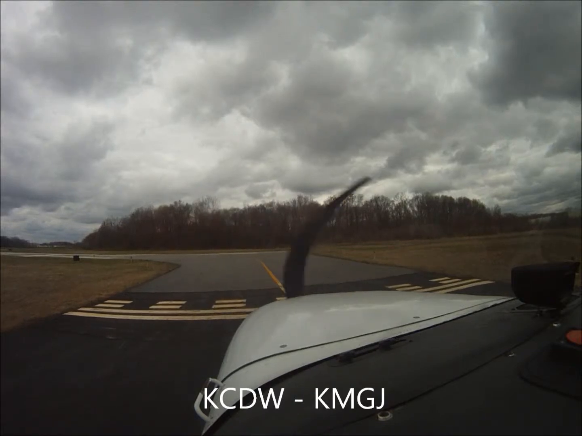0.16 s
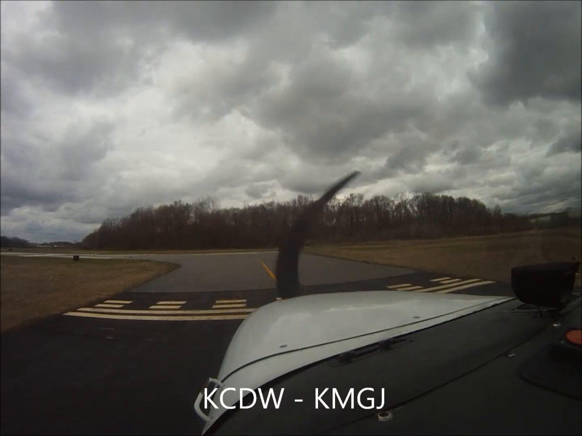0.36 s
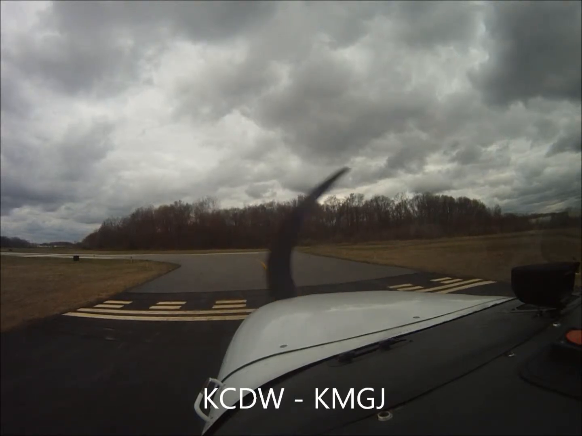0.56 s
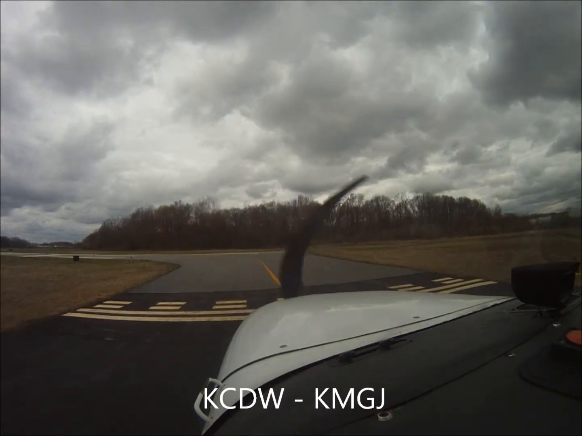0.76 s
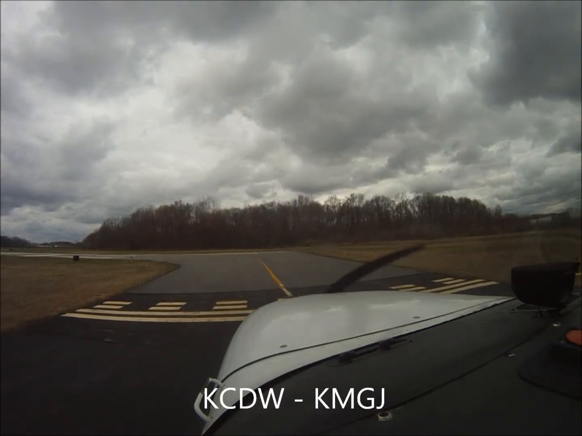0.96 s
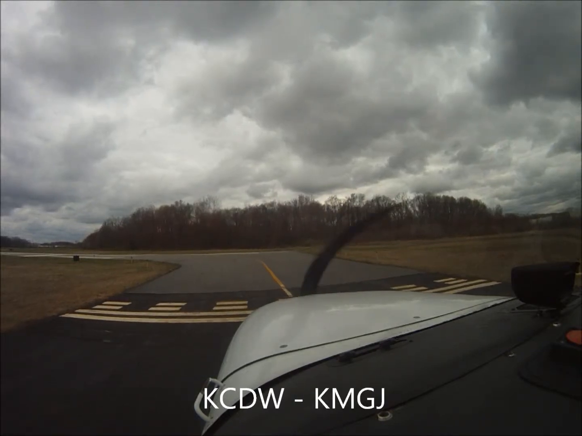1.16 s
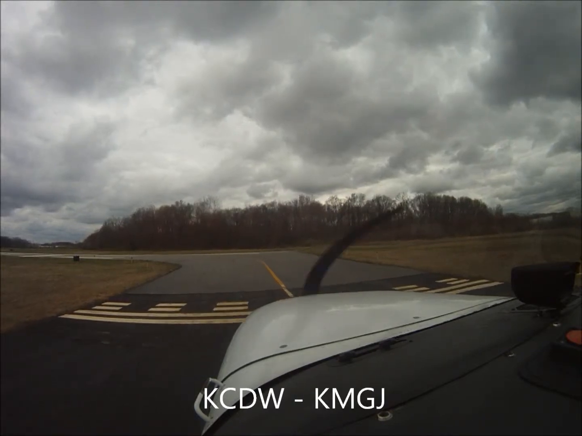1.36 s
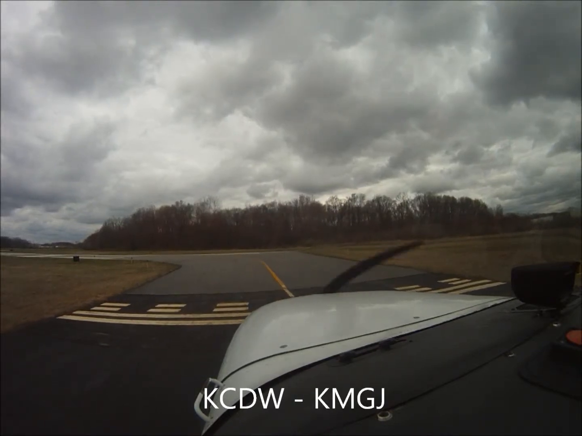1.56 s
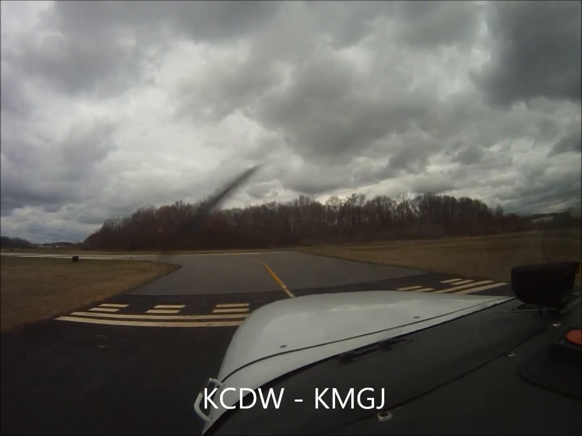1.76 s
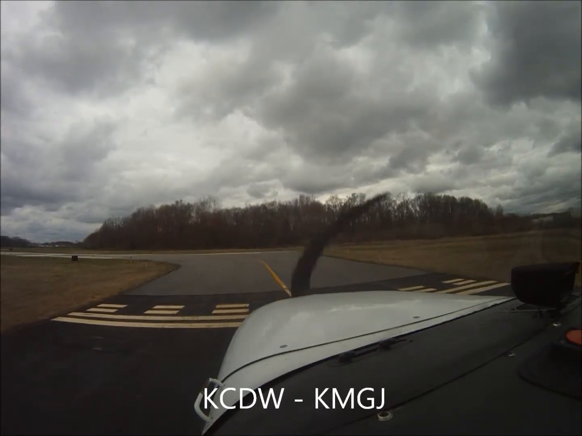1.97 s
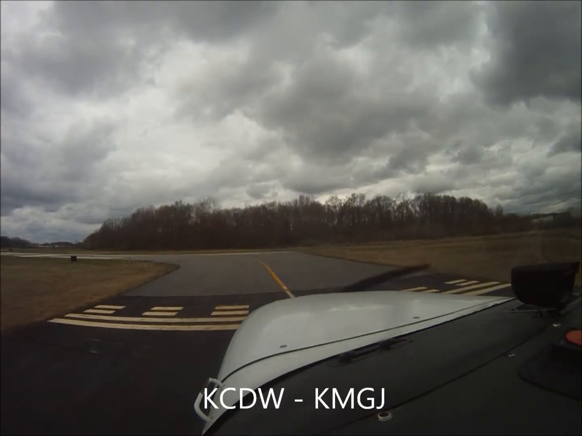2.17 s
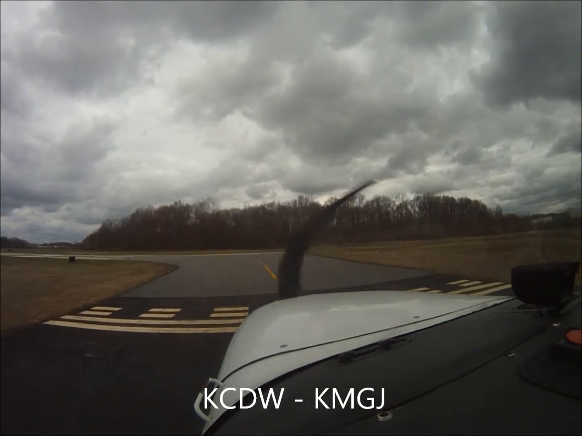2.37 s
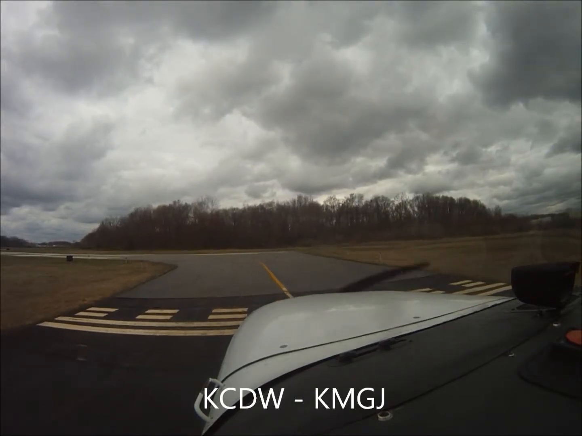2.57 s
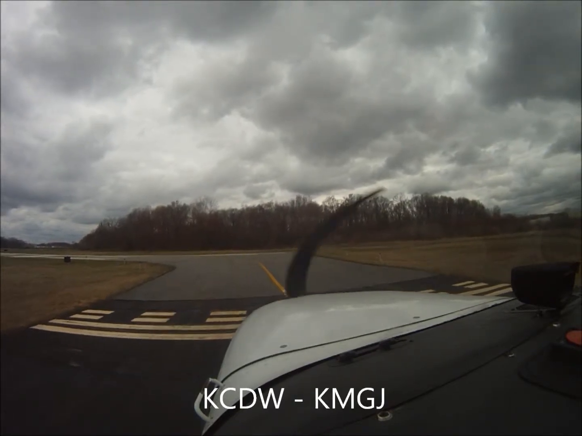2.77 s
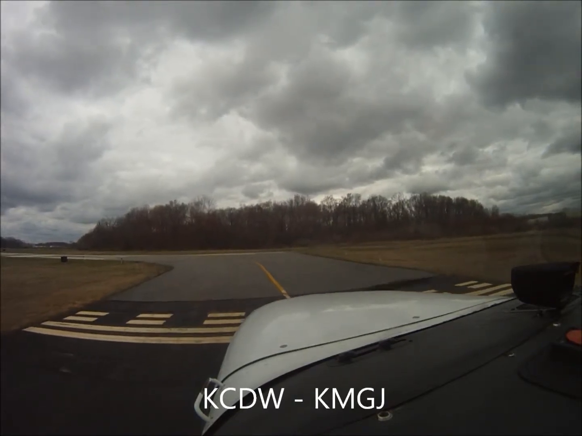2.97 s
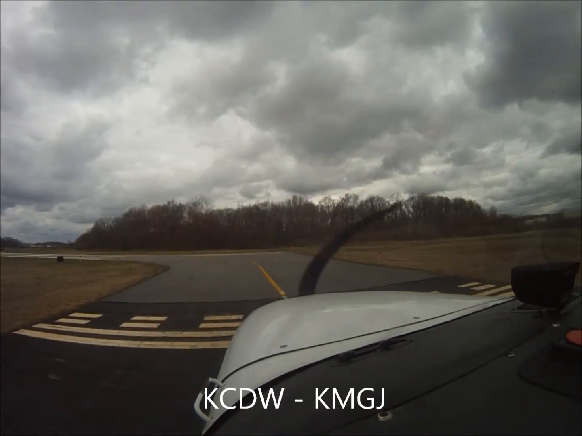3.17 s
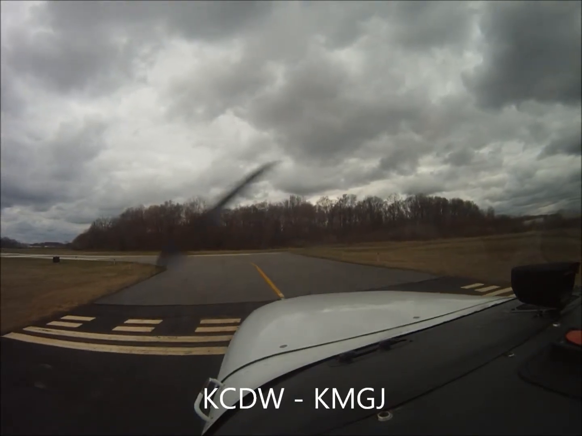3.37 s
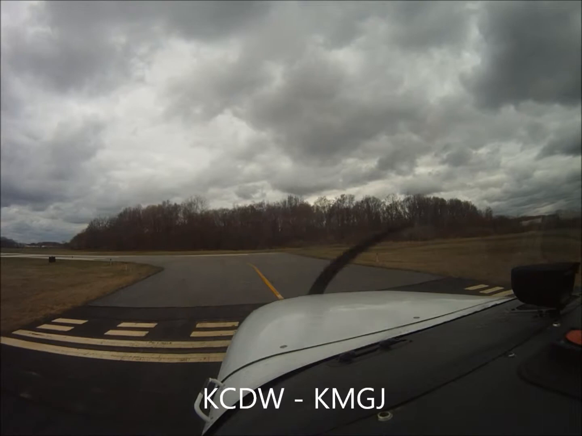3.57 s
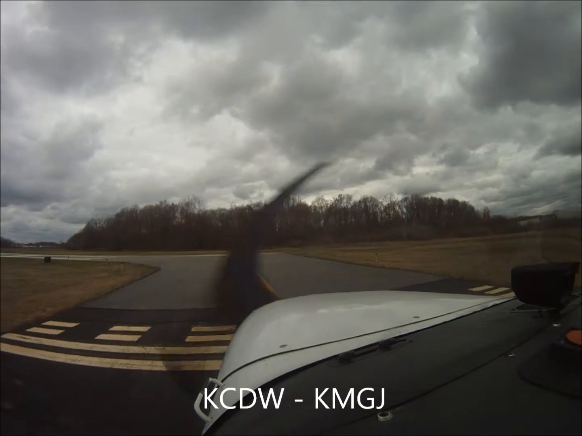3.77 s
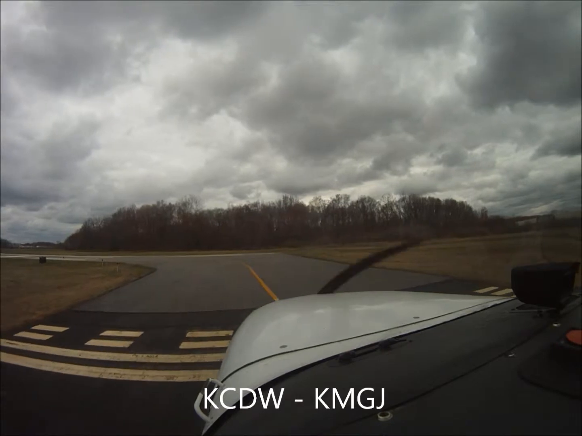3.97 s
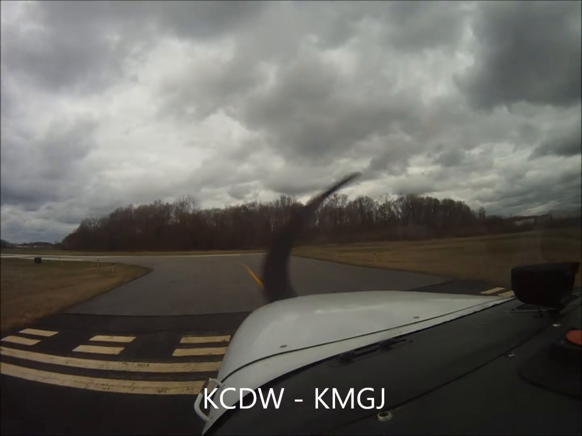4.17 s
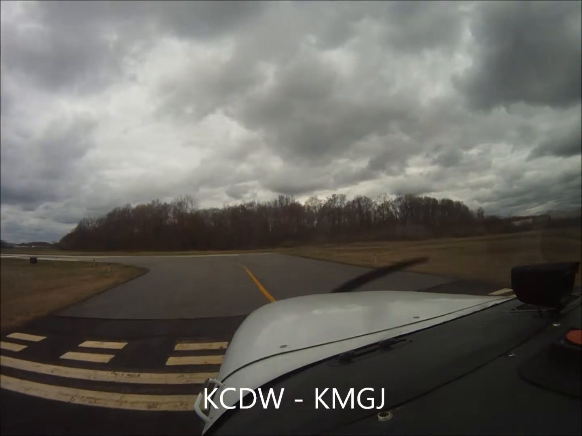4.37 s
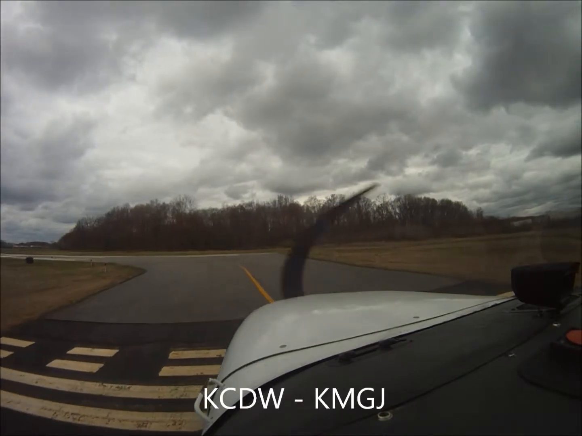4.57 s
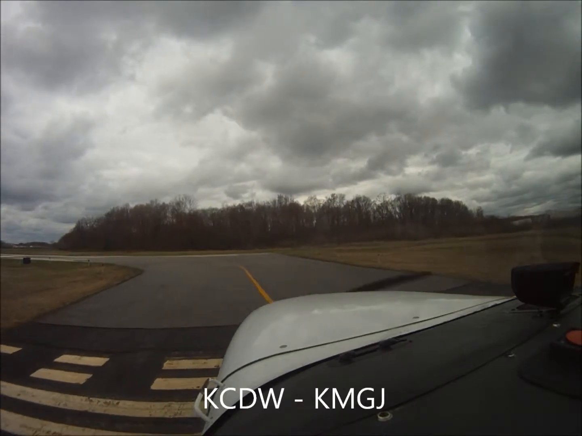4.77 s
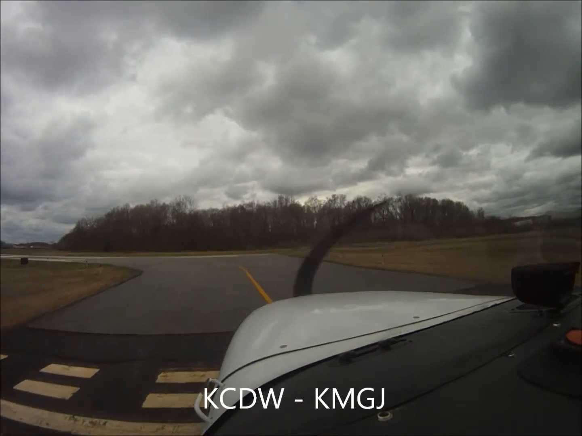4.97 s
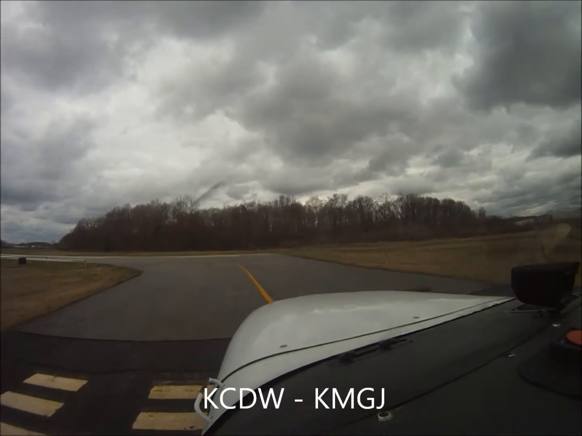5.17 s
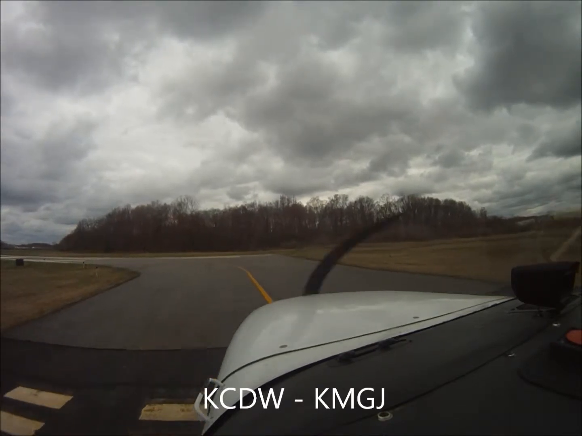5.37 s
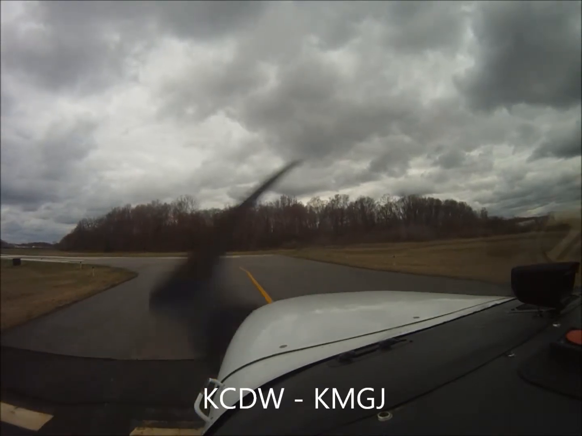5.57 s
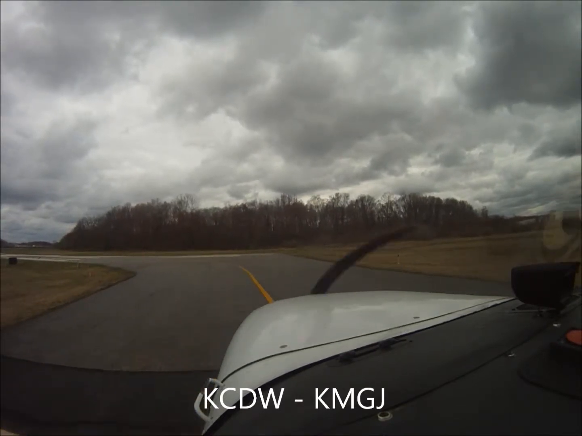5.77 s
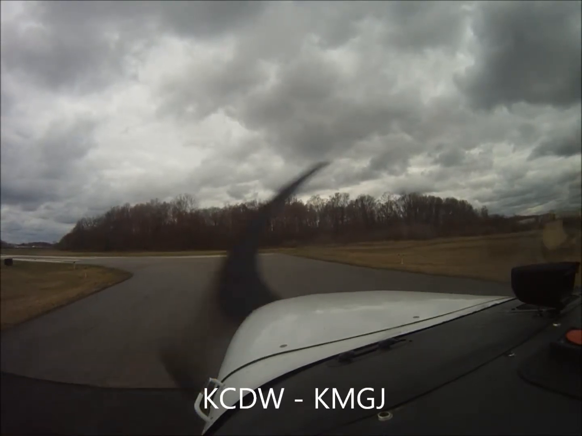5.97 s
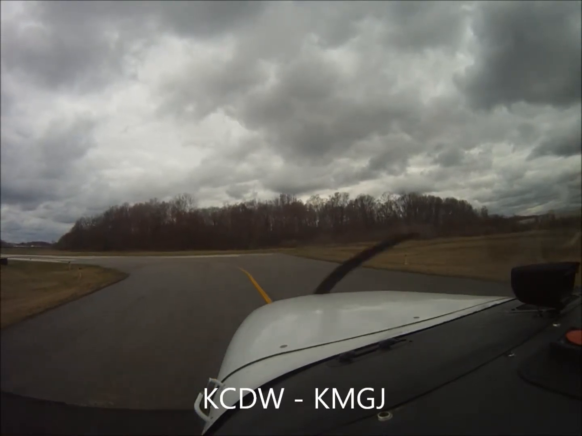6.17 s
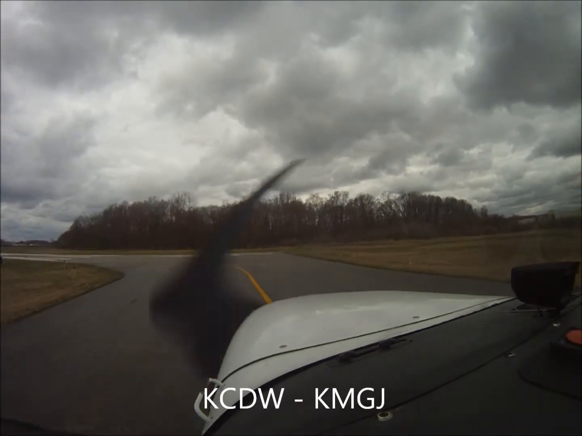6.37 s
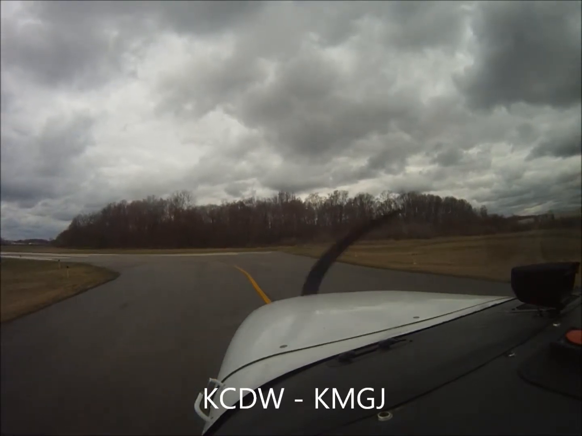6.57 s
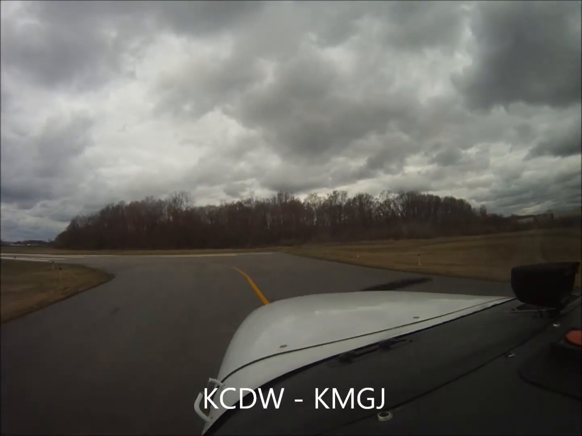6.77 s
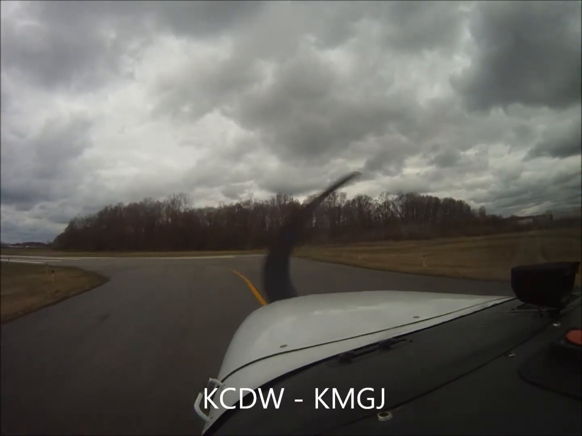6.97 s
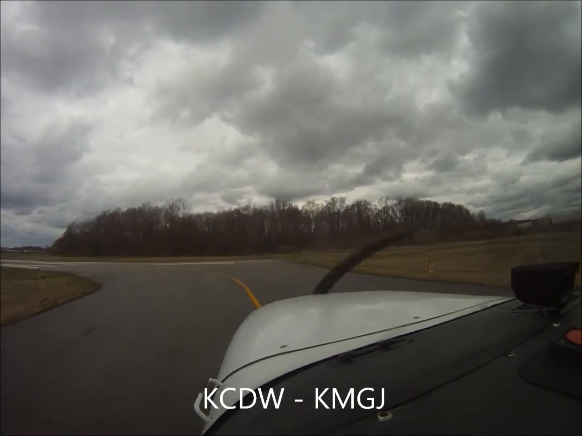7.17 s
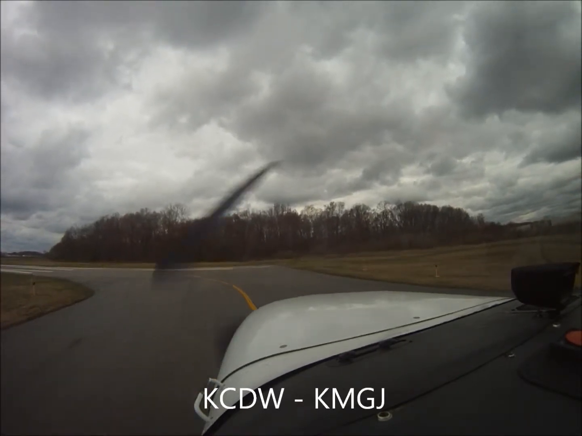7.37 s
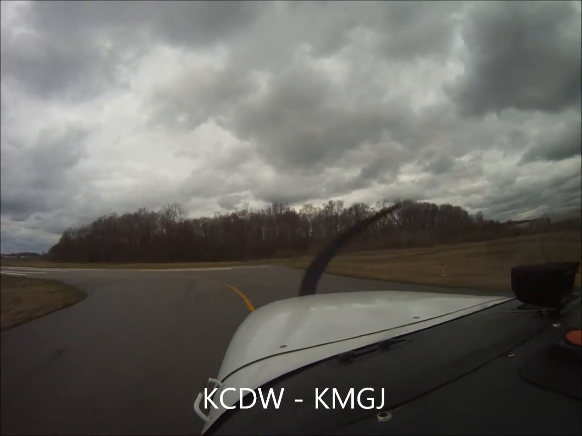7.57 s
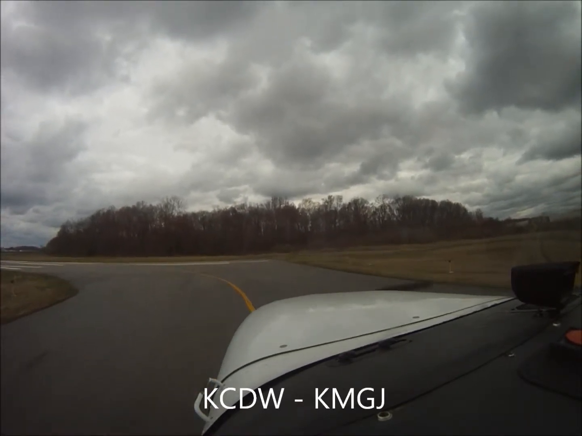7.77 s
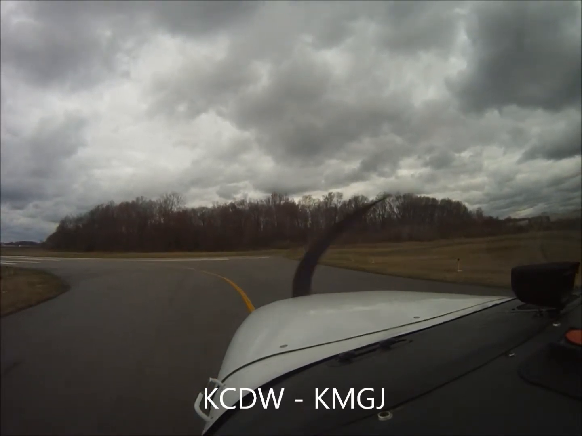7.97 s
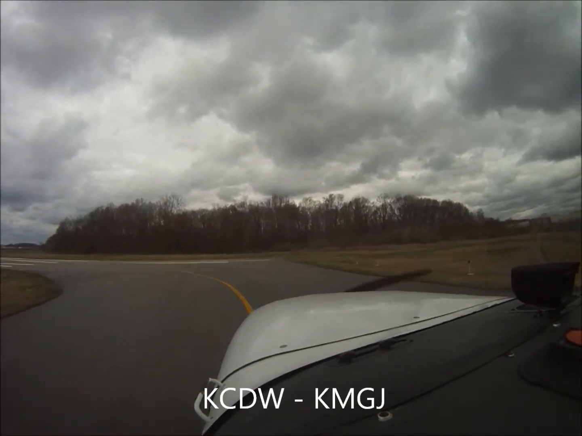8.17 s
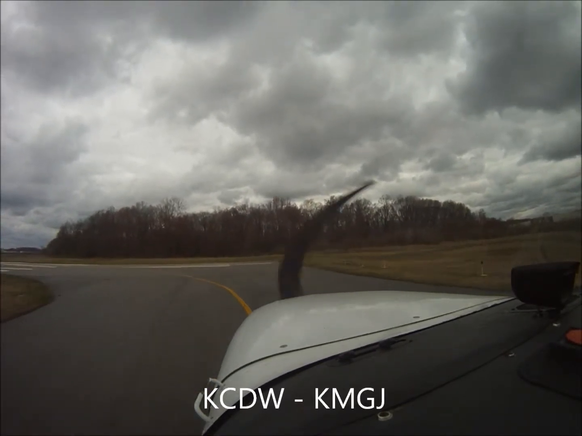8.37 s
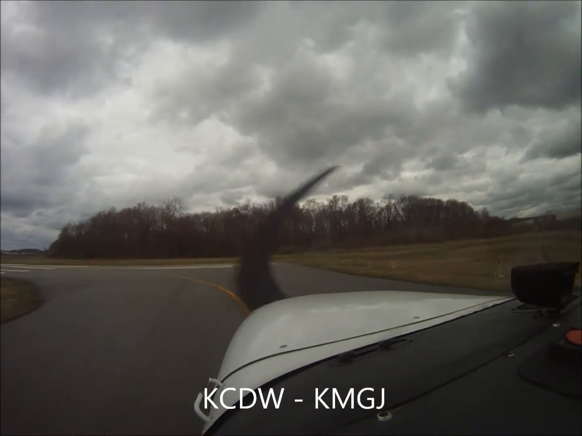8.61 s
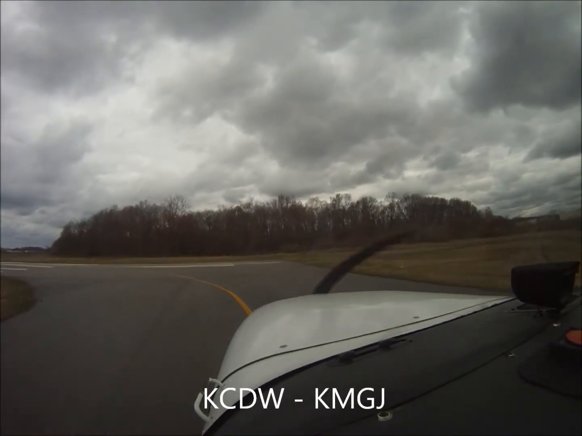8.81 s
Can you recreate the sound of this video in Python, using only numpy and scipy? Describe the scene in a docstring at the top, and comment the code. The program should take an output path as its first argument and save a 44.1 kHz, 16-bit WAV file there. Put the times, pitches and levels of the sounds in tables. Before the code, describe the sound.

Close inside a light aircraft cabin, a four-cylinder piston engine runs throughout. From 0 to 0.9 s it idles quietly and lumpily, about 35 low firings a second, with uneven knocks shaking panels. From 0.9 to 1.5 s it speeds up quickly, a panel knocking hardest around 1.5 s, then rises gently and swells until about 3.3 s, settling into a deep, booming drone near 42 firings a second. Low roar and a fainter higher buzz pulse with it; loose parts rasp and tick sparsely. At 4.0 s a sharp gritty scrape lasts under a tenth of a second, followed by a brief dip in level. Soft low thumps come at 5.8, 6.5 and around 7 s, as the pitch sags slightly and recovers by 7.8 s. Ticks and tiny squeaks crowd the last two seconds. The drone continues to 8.8 s, nearly mono, bass-heavy, with coarse, gritty treble.

```python
"""In the cabin of a taxiing light aircraft, a four-cylinder piston engine speeds up and settles.
The firings boom as tones locked to the engine; exhaust and propeller wash shake the panels as pulsing noise.
Blows ring panels and airframe; loose trim rasps, ticks, squeaks and once scrapes, as short noises and tones.
A mono camera samples the sound at 12 kHz and holds each sample, which mirrors it into the treble."""
import sys
import numpy as np
from scipy import signal
from scipy.fft import rfft, irfft, next_fast_len
from scipy.io import wavfile
from scipy.ndimage import uniform_filter1d

SR = 44100
rng = np.random.default_rng(int(sys.argv[2]) if len(sys.argv) > 2 else 0)


def materialize(psi):
    """Save the field psi as 16-bit PCM at rate SR to the path in sys.argv[1].

    A 1-D psi becomes a single channel; in a 2-D psi each row is a channel.
    """
    bounded = np.clip(np.atleast_2d(psi).T, -1, 1)
    quanta = np.round(bounded * 32767).astype(np.int16)
    wavfile.write(sys.argv[1], SR, quanta)


N = 389844  # length in samples


def undb(db):
    """Turn decibels into a plain gain."""
    return 10 ** (np.asarray(db) / 20)


def unit(x):
    """Scale a sound to an RMS level of 1."""
    return x / np.sqrt(np.mean(x ** 2))


def curves(table):
    """Read the columns of a time table at every sample, with straight lines between rows."""
    seconds, *columns = np.transpose(table)
    return [np.interp(np.arange(N) / SR, seconds, column) for column in columns]


def walk(rate):
    """A slow random wander of RMS 1: random levels, each held 1 / rate seconds, smoothed twice."""
    hold = int(SR / rate)
    steps = np.repeat(rng.standard_normal(N // hold + 1), hold)
    smooth = uniform_filter1d(uniform_filter1d(steps, hold), hold)
    return unit(smooth[:N])


def band(x, hz, width):
    """Keep only the band of this width around hz."""
    edges = [hz - width / 2, hz + width / 2]
    return signal.sosfilt(signal.butter(2, edges, "bandpass", fs=SR, output="sos"), x)


def burst(start_s, peak_ms):
    """Place, time axis and rise-and-fade shape of a short event that peaks after peak_ms."""
    start = int(start_s * SR)
    t = np.arange(min(4000, N - start)) / SR
    x = 1000 * t / max(peak_ms, .3)
    return slice(start, start + len(t)), t, x * np.exp(1 - x)


# How hard each of the four cylinders puffs, in firing order: relative level in dB.
CYLINDER_LEVELS = (-8.5, -13, -2.5, -8)


def puff_sizes(firings, scatter_db):
    """Gain of the current firing: its cylinder's level plus a scatter in dB, one value per firing."""
    count = firings.astype(int)
    return undb(np.array(CYLINDER_LEVELS)[count % 4] + scatter_db[count])


def puffs(firings, scatter_db, decay, steady):
    """An envelope that jumps up at each firing and fades (decay in firings), over a steady floor."""
    size = puff_sizes(firings, scatter_db * rng.standard_normal(N // 500))
    return steady + uniform_filter1d(size * np.exp(-(firings % 1) / decay), size=120)


def shaken(colour, gate, flicker_db, rate):
    """Pulsing coloured noise, split into half-octave bands that each flicker alone."""
    size = next_fast_len(N)
    octave = np.log2(np.arange(1, size // 2 + 2) * SR / size)
    hz, db = np.transpose(colour)
    gain = undb(np.interp(octave, np.log2(hz), db, -90, -90))
    spectrum = rfft(gate * rng.standard_normal(N), size) * gain
    out = 0
    for centre in np.arange(np.log2(hz[0]), np.log2(hz[-1]) + .5, .5):
        share = np.clip(1 - 2 * np.abs(octave - centre), 0, 1)
        out = out + irfft(spectrum * share, size)[:N] * undb(flicker_db * walk(rate))
    return unit(out)


# Tone colour of the low panel roar. Each row: frequency in Hz, relative level in dB per Hz.
ROAR_COLOUR = [(15, -19), (30, -8), (60, -0.5), (110, 3.5), (200, 0), (290, -9), (420, -4), (520, -13.5),
               (680, -12.5), (830, -18), (970, -26.5), (1080, -20.5), (1400, -37.5), (1800, -35.5)]


def roar(firings, roar_db):
    """Exhaust and propeller wash shake the panels: low noise that pulses with the firings."""
    gate = puffs(firings, 3.0, 0.22, steady=0.98)
    return undb(roar_db + 0.64 * walk(2.384)) * shaken(ROAR_COLOUR, gate, flicker_db=1.0, rate=8.8)


# Tone colour of the higher buzz. Each row: frequency in Hz, relative level in dB per Hz.
BUZZ_COLOUR = [(900, -7.5), (1300, -4), (1800, -8.5), (2170, 2.5), (2500, -6), (2900, -1), (3300, -5.5),
               (3800, -11.5), (4700, -11), (5200, -11.5), (5500, -21), (6300, -20)]


def buzz(firings, buzz_db):
    """A higher noise that pulses with the firings and fades more slowly after each than the roar."""
    gate = puffs(firings, 6.2, 0.46, steady=1.0)
    return undb(buzz_db + 0.48 * walk(18)) * shaken(BUZZ_COLOUR, gate, flicker_db=1.6, rate=12)


def rasp(firings):
    """A loose part chatters with the firings, mostly at one cylinder's, now and then much harder."""
    scatter_db = 2.8 * np.minimum(rng.exponential(size=N // 500), 4)
    envelope = puff_sizes(firings, scatter_db) * np.exp(-(firings % 1) / 0.15)
    chatter = uniform_filter1d(envelope, size=60) * rng.standard_normal(N)
    return unit(band(chatter, 1040, 460))


# Thumps through the airframe. Each row: start in seconds, level in dB.
THUMP_TIMES = [(5.799, -15), (6.523, -9.5), (6.716, -16.5), (6.999, -20), (7.045, -11), (7.14, -9),
               (7.475, -16), (7.668, -21), (8.303, -19)]
# Low airframe rings. Each row: frequency in Hz, starting level in dB against the thump,
# time to fade by 60 dB in seconds.
AIRFRAME_RINGS = [(193, -5, 0.1), (276, -1.5, 0.042), (435, -10.5, 0.07)]


def thumps():
    """A soft push sets off the low airframe modes, which ring and die away."""
    out = np.zeros(N)
    starts = rng.random((len(THUMP_TIMES), len(AIRFRAME_RINGS)))
    for (s, db), turns in zip(THUMP_TIMES, starts):
        part, t, _ = burst(s, 1)
        soft_start = 1 - np.exp(-t / 0.0011)
        for (hz, ring_db, t60), turn in zip(AIRFRAME_RINGS, turns):
            fade = undb(db + ring_db - 60 * t / t60)
            out[part] += fade * soft_start * np.sin(2 * np.pi * (hz * t + turn))
    return out


# Dry ticks of loose trim. Each row: start in seconds, level of the high ring in dB,
# extra dB for each ring further down, time to the peak in ms.
TRIM_TICKS = [(0.143, -50, -1, 1.2), (0.2313, -49, 2, 1.2), (0.7452, -51, 3, 1), (0.8016, -41, -5, 1.1),
              (0.956, -47, 3, 1.3), (1.0104, -45.5, 3, 1.1), (1.0675, -47.5, 3.5, 1.3),
              (1.1486, -51, 2, 1.2), (2.4788, -45, 2.5, 1.5), (3.6694, -47, 4.5, 1.3),
              (3.7736, -37.5, 0.5, 1.6), (3.899, -45, 3, 1.9), (4.2175, -46, 4, 1), (4.2383, -46.5, 5, 1.1),
              (4.2915, -48.5, 6, 1.5), (4.4054, -48.5, 4, 1.3), (4.896, -43, 4, 1.1),
              (5.0732, -59.5, 12, 2.3), (5.469, -51, 8, 1.2), (6.089, -42, 1.5, 0.95),
              (6.7176, -43, -4, 1.4), (6.81, -58, 10.5, 1.9), (6.8523, -56.5, 11.5, 1.6),
              (7.0305, -38, -2, 1.7), (7.1454, -43, 1.5, 2.7), (7.3148, -40.5, 2, 1.3),
              (7.4904, -46, -5, 1.3), (7.505, -41, -1, 1.5), (7.7557, -44, 2, 1.5), (7.8017, -39.5, 0.5, 3),
              (7.8098, -44.5, 3.5, 2.9), (7.928, -33.5, -6, 2.7), (7.945, -46, 1, 2), (8.0244, -40, 0, 1.1),
              (8.1178, -40, 2.5, 1.5), (8.2137, -37.5, -1, 1), (8.3138, -45, 1, 1.4),
              (8.384, -49, 6.5, 1.4), (8.4632, -46, 4, 1.2), (8.4871, -47, 1, 1.3), (8.5584, -43, 1, 1.2),
              (8.5999, -54, -2, 1.1), (8.7286, -42, 4, 3), (8.742, -41, 3, 6.3), (8.822, -42.5, 4, 1.1)]
# The high, middle and low ring of the trim. Each row: frequency in Hz, width in Hz.
TRIM_RINGS = [(4500, 1380), (2550, 1200), (1200, 730)]
# Faint ticks: lowest level in dB, upward scatter in dB, share of firings, time to the peak in ms.
FAINT_DB, FAINT_SCATTER_DB, FAINT_SHARE, FAINT_MS = -55.5, 3.5, .3, 0.83


def ticks(firings):
    """Loose trim ticks: short noise bursts through three rings; faint ones fall on chance firings."""
    out = np.zeros(N)
    high, mid, low = (unit(band(rng.standard_normal(N), hz, width)) for hz, width in TRIM_RINGS)
    firing_s = np.flatnonzero(np.diff(firings.astype(int)))[:-1] / SR
    pick, size, tilt = rng.random((len(firing_s), 3)).T
    faint_db = FAINT_DB - FAINT_SCATTER_DB * np.log(size)
    faint = np.c_[firing_s, faint_db, 6 * tilt - 1.5, np.full(len(firing_s), FAINT_MS)]
    for s, db, tilt_db, ms in [*TRIM_TICKS, *faint[pick < FAINT_SHARE]]:
        part, _, shape = burst(s, ms)
        rings = high[part] + undb(tilt_db) * mid[part] + undb(2 * tilt_db) * low[part]
        out[part] += undb(db) * shape * rings
    return out


# Short squeaks of the trim. Each row: start in seconds, level in dB, first and last frequency in Hz.
TRIM_SQUEAKS = [(6.72, -46, 4830, 4630), (7.041, -44, 4700, 4700), (7.147, -39, 4550, 4020),
                (7.16, -35.5, 3340, 3040), (7.505, -38, 4500, 5000), (7.524, -44.5, 5000, 5050),
                (7.801, -37, 4720, 4670), (7.801, -29, 2100, 2210), (7.928, -30.5, 4680, 4600),
                (8.119, -42.5, 4740, 4500), (8.119, -35, 2200, 2200)]
SQUEAK_MS = 3.3  # time to the peak


def squeaks():
    """The trim squeaks: rough little tones that slide in pitch for three times their rise."""
    out, rough = np.zeros(N), walk(900)
    for s, db, first_hz, last_hz in TRIM_SQUEAKS:
        part, t, shape = burst(s, SQUEAK_MS)
        hz = np.interp(t, [0, 3 * SQUEAK_MS / 1000], [first_hz, last_hz])
        tone = np.sin(2 * np.pi * np.cumsum(hz) / SR)
        out[part] += undb(db) * shape * (1 + 0.98 * rough[part]) * tone
    return out


# Moments of one loud short rasp, in seconds: start, broadens, loudest, broad part weaker,
# nearly gone, end.
SCRAPE_TIMES = (4.003, 4.015, 4.018, 4.036, 4.044, 4.066)
# The ring left behind: frequency in Hz, starting level in dB, time to fade by 60 dB in seconds.
SCRAPE_AFTER_RING = (4980, -44.5, .4)
SCRAPE_DB = -21.5  # before the envelopes


def scrape():
    """A rasp of rough noise that starts narrow, turns broad and leaves a faint ring behind."""
    t = np.arange(N) / SR
    grit = rng.standard_normal(N) * undb(0.95 * walk(400))
    narrow_level = np.interp(t, SCRAPE_TIMES, [0.02, 0.5, 0.73, 0.6, 0.2, 0.02])
    narrow = narrow_level * unit(band(grit, 2870, 750))
    broad_level = np.interp(t, SCRAPE_TIMES[1:], [0.0024, 0.85, 0.26, 0.098, 0.0049])
    broad = broad_level * (unit(band(grit, 3840, 2400)) + 0.64 * unit(band(grit, 1060, 1640)))
    after = np.clip(t - SCRAPE_TIMES[3], 0, None)
    hz, ring_db, t60 = SCRAPE_AFTER_RING
    ring = undb(ring_db - 60 * after / t60 + 1.7 * walk(90)) * np.sin(2 * np.pi * hz * after)
    return undb(SCRAPE_DB) * (broad + .5 * narrow) + ring


# Panel modes. Each row: frequency in Hz, relative level in dB, time to fade by 60 dB in seconds.
PANEL_MODES = [(289.7, 0, 0.13), (333.5, -0.5, 0.12), (515, 3, 0.029), (633, -10, 0.013),
               (815, -10.5, 0.046), (1042, -21.5, 0.039)]


def knocks(firings, scatter_db, loud_db):
    """Two uneven blows a firing, each a little late by chance, ring the panel modes."""
    beats = np.flatnonzero(np.diff((2 * firings).astype(int)))
    count = len(beats)
    late = rng.random(count) * 0.003886 * SR
    places = np.minimum(beats + late.astype(int), N - 1)
    # one of the eight blows in an engine cycle lands harder, by up to loud_db
    harder_db = loud_db[beats] * rng.random(count) * (np.arange(count) % 8 == 7)
    shared_db = scatter_db * rng.standard_normal(count) + harder_db
    out = 0
    for hz, db, t60 in PANEL_MODES:
        blows = np.zeros(N)
        blows[places] = undb(shared_db) * rng.uniform(0.21, 1, count) * rng.choice([-1, 1], count)
        # a turning, shrinking number rings at hz and dies away
        pole = np.exp(2j * np.pi * hz / SR - np.log(1000) / (t60 * SR))
        ring = signal.lfilter([1], [1, -pole], band(blows, hz, hz / 2)).imag
        out = out + undb(db) * unit(ring)
    return unit(out)


# The panel that one cylinder knocks: frequency in Hz, width in Hz.
KNOCKED_PANEL = (811, 82)
# Where the knocks are loudest: firing rate in Hz, spread in Hz, step in dB
# (half a step applies at that rate, one and a half steps far from it).
LOUDEST_SPEED = (40.07, 0.9, -8)
CHUG_ECHO_DB, CHUG_AT_S = -3.5, 1.53  # weaker knock half an engine cycle on; time of one knock


def chug(firings, hz):
    """One cylinder knocks a panel each engine cycle, hardest as the engine climbs through one speed."""
    half_cycle = ((firings - firings[int(CHUG_AT_S * SR)]) / 2) // 1
    at = np.flatnonzero(np.diff(half_cycle)) + 1
    blows = np.zeros(N)
    blows[at] = undb(CHUG_ECHO_DB * (half_cycle[at] % 2) + 2.1 * rng.standard_normal(len(at)))
    best_hz, spread_hz, step_db = LOUDEST_SPEED
    near = np.exp(-((hz - best_hz) / spread_hz) ** 2)
    return undb(step_db * (1.5 - near)) * unit(band(blows, *KNOCKED_PANEL))


# How the cabin passes the three lowest multiples of the firing rate as they climb.
# Each row: frequency in Hz, level in dB at settled power.
CABIN_BOOM = [(34, -22.5), (36, -21.5), (39, -17), (42.5, -20.5), (69, -24.5), (75, -26.5), (80, -23),
              (84, -19.5), (85.5, -20), (104, -21.5), (111, -17.5), (120, -25), (125.5, -25), (128, -24.5)]
# Weaker lines. Each row: multiple of the firing rate, level against the panel roar in dB
# while slow, the same when settled, both before the cabin air lifts the line.
WEAK_LINES = [(.5, -27, -7.5), (.75, -20, -9), (1.25, -14, -7.5), (2.5, -20, -12.5), (4, -5.5, -12),
              (5, -7.5, -15), (6, -12, -14.5), (6.75, -42, -15), (8, -36, -23.5), (10, -14, -25),
              (12, -20, -16), (15, -13.5, -23), (20, -25.5, -33)]
# An air mode that lifts whichever line passes it: frequency in Hz, width in Hz, lift in dB.
CABIN_AIR = (205, 13.2, 8.7)


def boom(firings, hz, power_db, roar_db):
    """Firing beats boom in the cabin: wavering tones at multiples of the firing rate."""
    out, uneven_db = 0, 1.3 * walk(16)
    # the three strong lines add up to a rise and a steep pressure drop at each firing
    for k in range(1, 4):
        db = power_db + np.interp(k * hz, *np.transpose(CABIN_BOOM))
        db = db + 0.12 * walk(22) + (k > 1) * uneven_db
        phase = 2 * np.pi * k * (firings - .32) - .6 + 0.078 * k * walk(11)
        out = out - np.sqrt(2) * undb(db) * np.cos(phase)
    settled = np.clip((hz - hz.min()) / (hz.max() - hz.min()), 0, 1)  # 0 slowest, 1 fastest
    mode_hz, width_hz, lift_db = CABIN_AIR
    for k, slow_db, settled_db in WEAK_LINES:
        lift = lift_db / (1 + (2 * (k * hz - mode_hz) / width_hz) ** 2)
        db = roar_db + slow_db + (settled_db - slow_db) * settled + lift + 2.5 * walk(5)
        phase = 2 * np.pi * (k * firings + rng.random()) + 0.18 * walk(6.6)
        out = out + np.sqrt(2) * undb(db) * np.cos(phase)
    return out


# Brief dips of the whole level. Each row: start in seconds, depth in dB before smoothing,
# recovery time in seconds.
LEVEL_DIPS = [(4.045, -6.5, 0.06), (5.9, -3, 0.015), (6.742, -4, 0.03), (7.005, -3.5, 0.038)]


def dips():
    """A gain that drops briefly at a few moments and eases back."""
    t = np.arange(N) / SR
    dip_db = sum(db * (t > s) * np.exp(-np.clip(t - s, 0, None) / back) for s, db, back in LEVEL_DIPS)
    return undb(uniform_filter1d(dip_db, size=200))


# Engine speed over time. Each row: time in seconds, firing rate in Hz.
ENGINE_SPEED = [(0, 35), (.75, 34.65), (.95, 35.7), (1.5, 40.4), (1.75, 41.3), (2.4, 42.3), (3.1, 42.72),
                (6, 42.68), (6.8, 41.97), (7.4, 41.85), (7.8, 42.22), (8.84, 42.25)]
# Engine level over time. Each row: time in seconds, level of the whole engine against its
# settled level in dB, extra level of the buzz in dB.
ENGINE_POWER = [(0, -8.5, 1.5), (.9, -6, 1.5), (1.4, -6, 0.5), (2.1, -4, -1), (2.6, -2, 0.5), (3.3, 0, 0),
                (4.2, -0.5, 0), (5.8, 0, 0), (7.3, -1, 0), (8, 0.5, 0.5), (8.84, 0, 1.5)]
ROAR_DB, BUZZ_DB, SHAKE_DB = -26, -47.5, -32.5  # levels at settled power
SHAKE_FOLLOWS = 0.54  # dB of panel blows per dB of engine level
LOUD_BLOW_DB, LUMPY_IDLE = 7, 0.61  # hardest extra blow; dB more per dB of lower engine level
CHUG_DB = -8.5  # against the panel roar, before the effect of speed


def scene():
    """Let one engine drive the cabin sounds, add the other trim and airframe noises, then the dips."""
    (hz,), (power_db, extra_db) = curves(ENGINE_SPEED), curves(ENGINE_POWER)
    roar_db, buzz_db = ROAR_DB + power_db, BUZZ_DB + power_db + extra_db
    firings = np.cumsum(hz) / SR  # running count; four firings make one engine cycle
    cabin = roar(firings, roar_db) + buzz(firings, buzz_db)
    cabin = cabin + undb(buzz_db - 4.5) * rasp(firings)
    cabin = cabin + thumps() + ticks(firings) + squeaks() + scrape()
    blows = knocks(firings, 1.56, LOUD_BLOW_DB - LUMPY_IDLE * power_db)
    cabin = cabin + undb(SHAKE_DB + SHAKE_FOLLOWS * power_db) * blows
    cabin = cabin + undb(roar_db + CHUG_DB) * chug(firings, hz)
    cabin = (cabin + boom(firings, hz, power_db, roar_db)) * dips()
    return np.array([cabin, cabin])


# How far the channels differ. Each row: frequency in Hz, left minus right against their sum in dB.
CHANNEL_DIFFERENCE = [(30, -46), (125, -54), (600, -48.5), (1000, -24), (2000, -20.5), (4000, -22),
                      (8000, -17.5), (12000, -41)]
HOLD_HZ, FINE_HZ, TOP_HZ = 12000, 48000, 15500  # slow sampling rate, rate of the steps, top cut


def record(dry):
    """Band-limit, sample slowly, hold each sample as a step, set the channels apart, cut the top."""
    mono = signal.sosfilt(signal.butter(4, 5600, fs=SR, output="sos"), dry[0])
    repeats = FINE_HZ // HOLD_HZ
    slow = signal.resample_poly(mono, FINE_HZ, SR, padtype="line")[::repeats]
    held = signal.resample_poly(np.repeat(slow, repeats), SR, FINE_HZ, padtype="line")[:N]
    hz, db = np.transpose(CHANNEL_DIFFERENCE)
    size = next_fast_len(N)
    bins_hz = np.arange(1, size // 2 + 2) * SR / size
    gain = undb(np.interp(np.log(bins_hz), np.log(hz), db))
    # a late copy is unrelated enough to keep left and right equally loud
    late = np.pad(held, (1500, 0), "reflect")[:N]
    side = irfft(gain * rfft(late, size), size)[:N]
    top_cut = signal.ellip(10, .2, 70, TOP_HZ, fs=SR, output="sos")
    return signal.sosfilt(top_cut, np.array([held + side, held - side]))


dry = scene()
out = record(dry)
materialize(out)
```